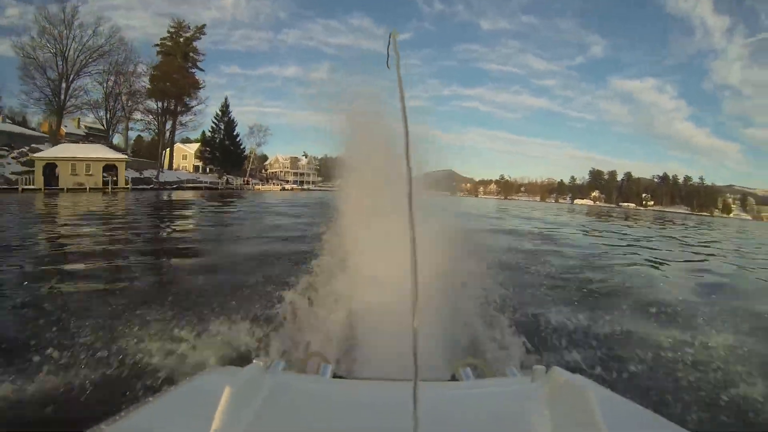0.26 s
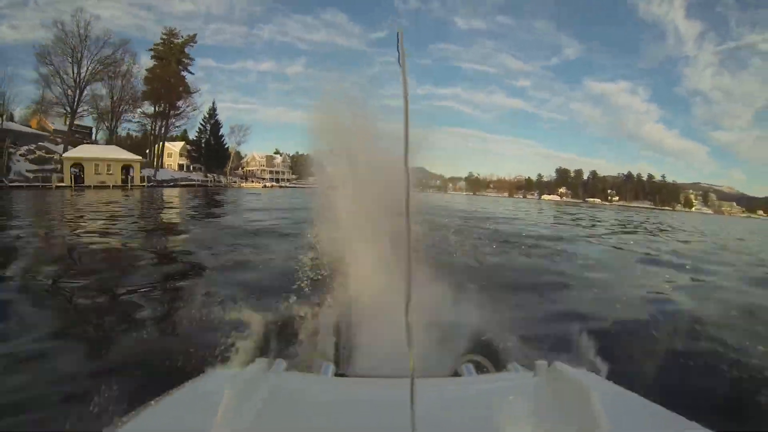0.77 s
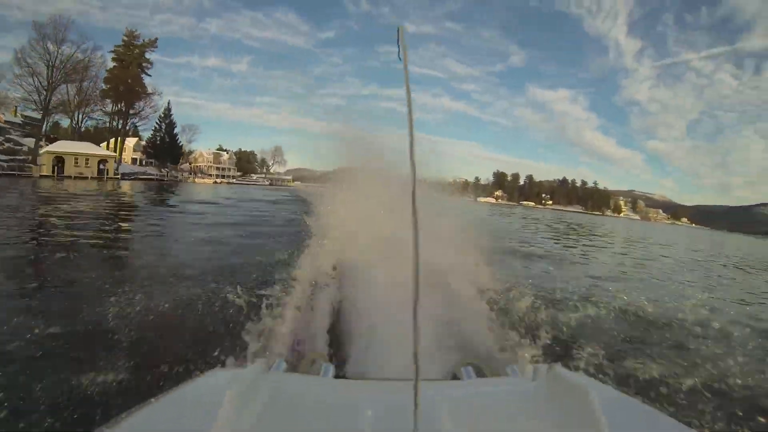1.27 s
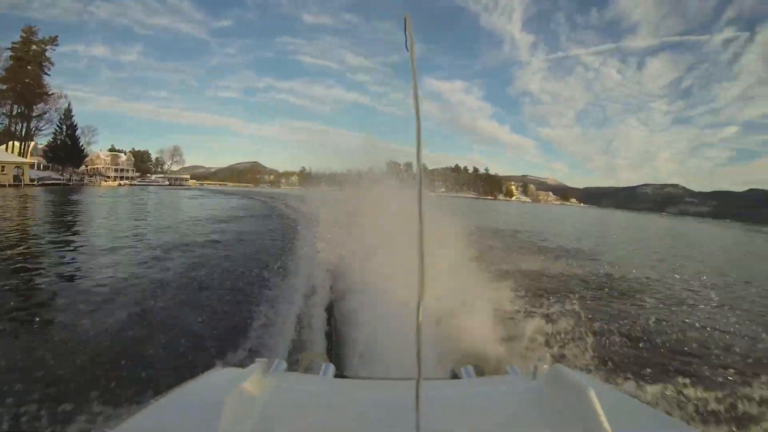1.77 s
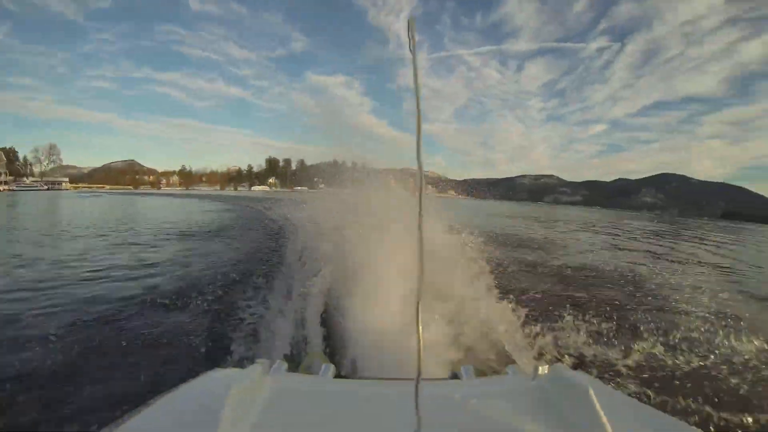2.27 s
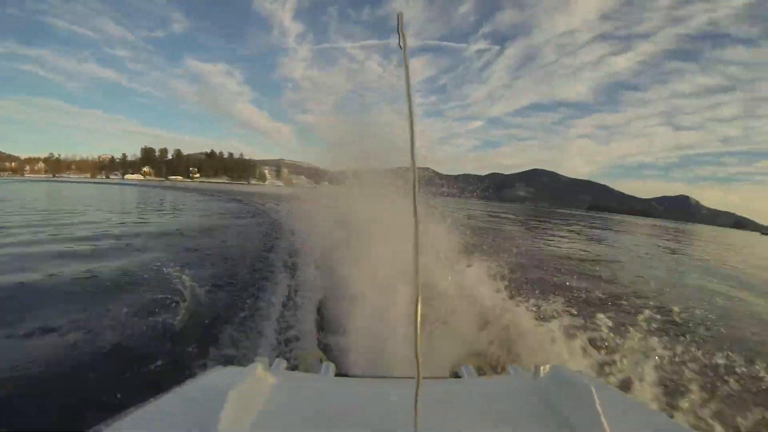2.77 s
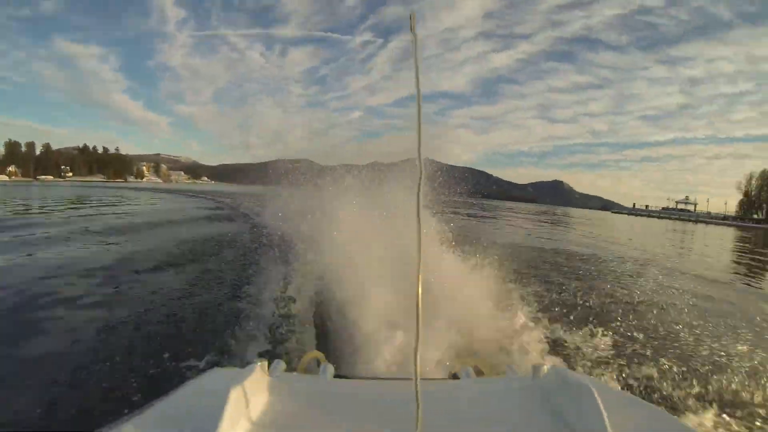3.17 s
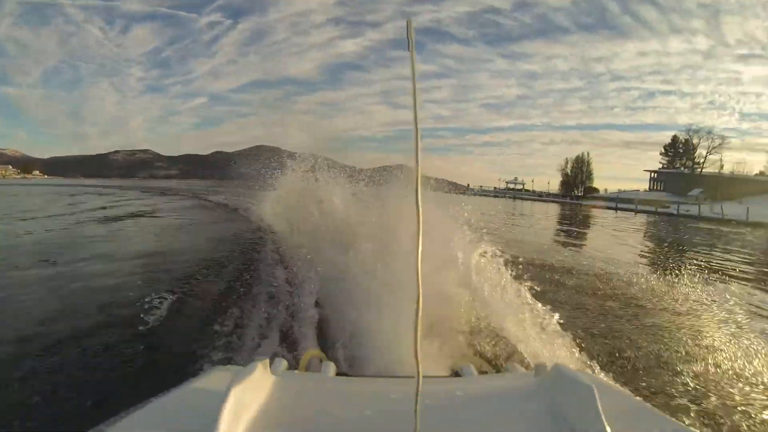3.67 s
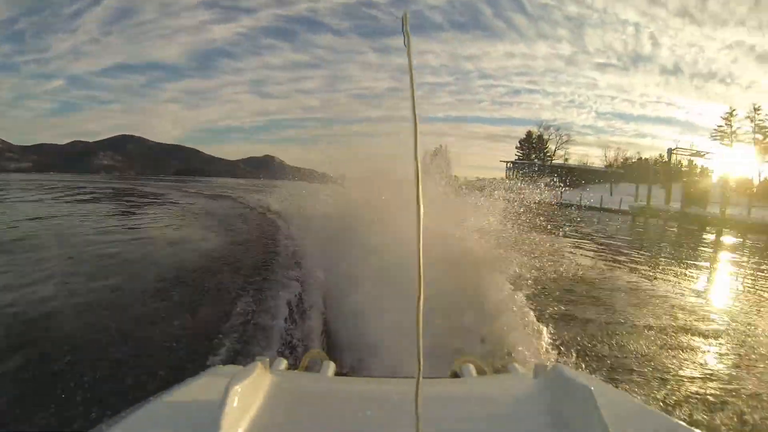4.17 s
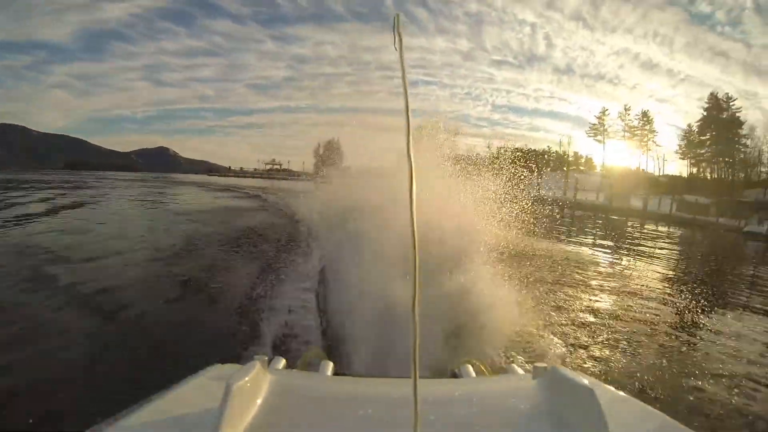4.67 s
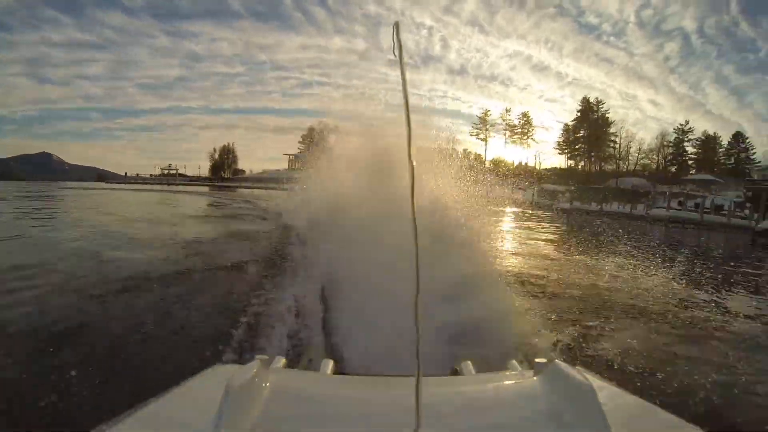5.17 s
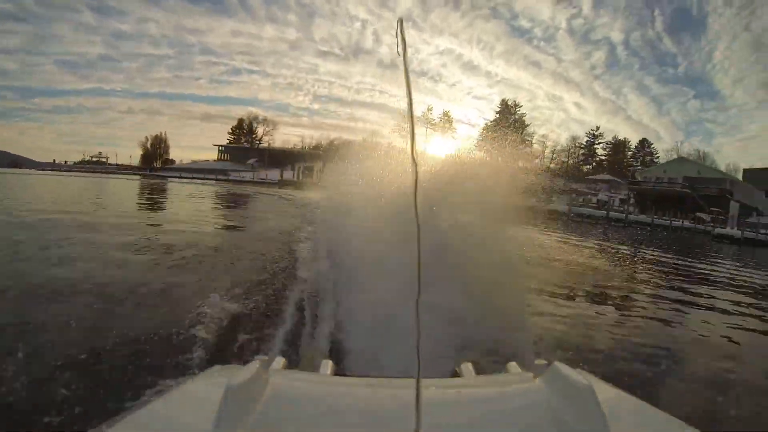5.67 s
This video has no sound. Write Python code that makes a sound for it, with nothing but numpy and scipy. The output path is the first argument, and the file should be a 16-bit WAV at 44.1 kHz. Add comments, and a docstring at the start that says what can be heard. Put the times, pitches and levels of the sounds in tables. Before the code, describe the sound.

A small two-stroke engine buzzes at high revs, driving a model racing boat across a lake, heard from the boat's own deck. The pitch sags through a long turn, then climbs again, and the exhaust blares in short surges. The hull drones, its panels rattle and loose fittings tick, while water slaps underneath and spray hisses faintly.

```python
"""A buzzing, rattling two-stroke drives a model racing boat over a lake, heard from its own deck.
The revs sag in a long turn and climb again; the exhaust blares whenever the propeller bites.
Every firing shakes the hull: it drones at the firing rate, its panels ring, and loose fittings
chatter and tick. Water slaps the hull, spray hisses faintly and the chop thumps below."""
import sys
import numpy as np
from scipy import signal
from scipy.fft import rfft, irfft
from scipy.io import wavfile
from scipy.ndimage import uniform_filter1d

SR = 44100
rng = np.random.default_rng(int(sys.argv[2]) if len(sys.argv) > 2 else 0)


def store_wav(level_fs):
    """Save 16-bit WAV to argv[1]."""
    pcm = np.round(np.clip(np.atleast_2d(level_fs), -1, 1) * 32767)
    wavfile.write(sys.argv[1], SR, pcm.T.astype(np.int16))


N = 261027
TIME = np.arange(N) / SR

# propeller bites: (time [s], length [s], exhaust rise [dB], sag [firings/s], recovery [s])
BITES = [(-0.05, 0.3, 6, 0, .1), (0.242, .215, 9, 0, .1), (.5, 0.076, 6, 0, .1), (0.726, 0.037, 10, 0, .1),
         (1.505, 0.27, 4.5, 0, .1), (2.17, 0.14, 7.5, 5.5, .24), (2.52, .26, 4, 4.5, .26),
         (2.866, 0.055, 7.5, 6, 0.087), (3.02, .065, 4, 2, 0.087), (3.248, 0.14, 6, 1, 0.14),
         (3.68, 0.068, 7, 8, 0.29), (4.281, 0.086, 6, 6.5, .11), (4.604, 0.062, 3.5, 9.5, .1),
         (5.42, .52, 4.5, 0, 0.099)]
# water slapping the hull: (time [s], length [s], jolt [dB], relative splash [dB], relative thud [dB])
SLAPS = [(0.324, 0.031, -0.5, -28.5, -39), (0.378, .015, -4, -27.5, -37), (0.415, 0.028, 0.5, -32, -41),
         (0.492, 0.026, 1.5, -28.5, -36), (0.541, .045, 2, -29.5, -30), (0.64, 0.021, 4.5, -33, -47),
         (0.735, 0.032, 1, -30, -19), (0.823, .02, 1, -34, -42), (0.902, 0.025, 3.5, -30, -41),
         (1.158, 0.05, 0, -34, -50), (1.816, 0.028, 4.5, -45, -50), (2.057, .025, 3.5, -36, -45),
         (2.546, 0.018, 3, -38, -45), (2.811, 0.034, -1, -42, -45), (4.554, 0.017, 1, -38, -50),
         (5.308, 0.03, 3.5, -39, -55)]
# ring of the loose fittings: (frequency [Hz], width [Hz], gain [dB])
FITTING_MODES = [(3244, 260, -1), (3836, 75, 1.5), (4720, 220, -8), (5256, 230, 1), (5780, 420, -8)]
# bright colour of a sharp contact: (frequency [Hz], gain [dB])
CONTACT_COLOUR = [(3000, -2), (4300, -1.5), (6000, 0.5), (6500, -26), (7400, -12.5), (8200, 3.5),
                  (8900, -4.5), (9400, -2.5), (10500, -8.5), (11300, -12), (12000, -8), (12900, -9.5),
                  (13400, -15), (14500, -28)]


def hull_drone(turns, revs, shake_db):
    """The hull hums along with the piston; skipping over the water makes it stutter and fall behind."""
    # fader of the drone: (time [s], relative level [dB])
    drone_fader = [(0, -22.5), (.42, -25), (.64, -16), (.78, -21), (1.25, -11.5), (1.42, -16.5),
                   (1.85, -14.5), (2.1, -16), (2.4, -15), (2.8, -17), (3.3, -15.5), (4.5, -14.8),
                   (4.9, -13.5), (5.92, -14.3)]
    # brief stumbles in the drone: (time [s], length [s], drop [dB])
    stumbles = [(.487, 0.015, 6), (.575, .03, 9), (.77, .07, 3), (.93, 0.028, 8), (2.178, 0.07, 9),
                (2.3, 0.04, 8), (2.375, 0.03, 12), (2.52, 0.048, 8), (2.695, .05, 10), (2.96, 0.033, 11),
                (3.115, .045, 7), (3.415, 0.047, 8), (3.625, .055, 5), (3.755, 0.061, 5), (3.98, .02, 7),
                (4.595, 0.045, 7)]
    fastest_bounce_hz = 214.7
    free_share = np.minimum(follow_shake(shake_db, usual_db=-7, slope=1.4), 1)
    angle = 2 * np.pi * np.cumsum(np.minimum(revs, fastest_bounce_hz)) / SR
    bounce = drift(16.6) * np.sin(angle) + drift(16.6) * np.cos(angle)
    bounce = band(bounce, low_hz=152, high_hz=334)
    sway = evened(blend(np.sin(2 * np.pi * turns), bounce, free_share), size=2000)
    # alternate firings differ more when the hull bounces
    sub_octave = from_db(-26) * free_share * drift(12) * np.sin(np.pi * turns)
    level_db = in_time(drone_fader) - spells(stumbles, edge_s=.016) + 2.65 * free_share * drift(16.6)
    # the hull's lopsided swing adds an octave
    octave = from_db(-34 + 3.8 * drift(8)) * np.sqrt(2) * np.cos(4 * np.pi * turns)
    return from_db(level_db + .34) * (sway + sub_octave + octave)


def exhaust(turns, revs, shake_db, bite_db):
    """Low harmonics blare through the pipe; they flutter when water muffles the outlet."""
    # exhaust harmonics: (multiple of the firing rate, relative level [dB])
    harmonics = [(2, -2.5), (3, -5), (4, -2), (5, -8.5), (6, -2.5), (7, 2.5)]
    # colour of the pipe: (frequency [Hz], gain [dB])
    pipe_colour = [(340, -3.5), (430, -6.5), (490, 4.5), (570, 6.5), (650, -4), (695, 8.5), (790, -14.5),
                   (870, 4.5), (950, 3), (1060, -3), (1200, -1.5), (1400, -10)]
    flutter = np.clip(1 - bite_db / 8, .25, 1)
    blare = 0
    for multiple, db in harmonics:
        wobble = .32 * flutter * drift(12)
        flicker_db = 5.4 * flutter * drift(20)
        offset = (multiple - 2) * rng.random()   # only the octave is phase-aligned with the crank
        phase = 2 * np.pi * (multiple * turns + offset) + wobble
        blare += at_hz(pipe_colour, multiple * revs) * from_db(db + flicker_db) * np.sin(phase)
    return follow_shake(shake_db, usual_db=-30, slope=.88) * from_db(bite_db) * evened(blare)


def engine_speed():
    """Firings per second, one a turn: propeller bites drag the revs down, and they climb back."""
    # engine speed between bites: (time [s], rate [firings/s])
    free_revs = [(0, 242.5), (.22, 242.5), (.27, 236.2), (.46, 235.5), (.52, 244), (.64, 233.6),
                 (.72, 251.5), (.8, 234.8), (.87, 228.5), (.94, 230.5), (1.04, 224.3), (1.18, 222.8),
                 (1.36, 196.5), (1.47, 191.3), (1.59, 192.2), (1.77, 181.8), (2.02, 176), (2.8, 175),
                 (3.0, 172), (3.33, 172.3), (3.45, 179), (4.0, 178.7), (4.42, 187.3), (4.8, 185.8),
                 (4.97, 207), (5.13, 214.8), (5.21, 212), (5.33, 219), (5.46, 220.1), (5.59, 214.3),
                 (5.65, 217.6), (5.92, 220.2)]
    fall_s, lag_s = .11, .015   # the sag is deepest just after the blare begins
    sag = 0
    for start, _, _, depth, recovery_s in BITES:
        age = TIME - start - lag_s
        sag += depth * np.clip(1 + np.minimum(age / fall_s, -age / recovery_s), 0, 1)
    return (in_time(free_revs) - sag) * (1 + .0012 * drift(25))


def panel_rattle(turns, jolt_db, bite_db):
    """Firings knock the deck and hatch in step; loose edges knock back at uneven moments."""
    firing = knocks(turns, lag=0, scatter=.003, spread_db=1.5)
    chatter = knocks(turns, lag=.2926, scatter=.1558, spread_db=4.5)
    chatter -= knocks(turns, lag=.7, scatter=.2077, spread_db=2)
    looseness = .83 + .16 * bite_db - .035 * TIME   # rises at each bite, settles during the run
    deck = deck_ring(firing, chatter, looseness, jolt_db, bite_db)
    return deck + hatch_buzz(firing, chatter, looseness, jolt_db)


def deck_ring(firing, chatter, looseness, jolt_db, bite_db):
    """The knocked deck panels ring in the midrange, louder on jolts and bites."""
    # deck panel modes: (frequency [Hz], width [Hz], gain [dB])
    modes = [(1327, 144, -6), (1421, 75, 3.5), (1516, 82, -1), (1608, 53, -2), (1760, 81, -7),
             (1926, 41, -5), (2068, 26, -14)]
    # fader of the deck: (time [s], level [dB])
    deck_fader = [(0, -17), (.6, -16), (1.22, -17), (1.34, -29.5), (1.55, -22.5), (1.9, -20.5), (2.05, -18),
                  (2.9, -16.5), (3.5, -20), (4.35, -18), (4.47, -24.5), (4.68, -18.5), (4.83, -20),
                  (4.9, -27), (5.15, -21.5), (5.26, -26), (5.35, -19), (5.92, -21)]
    # the flexing hull drives each mode more or less hard from moment to moment
    in_step = sum((-1) ** k * from_db(3.63 * drift(27)) * resonate(firing, [mode])
                  for k, mode in enumerate(modes))
    # chatter builds up mostly in the lower, freely swinging modes
    rattling = resonate(chatter, modes[:4]) + from_db(-3.5) * resonate(chatter, modes[4:])
    in_step, rattling = (band(x, low_hz=1040, high_hz=2254) for x in (in_step, rattling))
    level_db = in_time(deck_fader) + .5 * jolt_db + .15 * bite_db + drift(19)
    return from_db(level_db) * blend(in_step, rattling, looseness)


def hatch_buzz(firing, chatter, looseness, jolt_db):
    """The same knocks set the hatch buzzing, pitched above the deck."""
    # hatch modes: (frequency [Hz], width [Hz], gain [dB])
    modes = [(2440, 83, -5.5), (2598, 36, -1.5), (2683, 108, -8.5)]
    # fader of the hatch: (time [s], relative level [dB])
    hatch_fader = [(0, -30), (1.2, -31), (1.33, -43), (1.65, -34.5), (1.9, -37.5), (2.7, -32), (2.95, -36),
                   (4.1, -36), (4.47, -29), (4.61, -38.5), (4.7, -29.5), (4.83, -28.5), (4.89, -41),
                   (5.15, -36), (5.92, -30.5)]
    in_step, rattling = (band(resonate(x, modes), low_hz=2010, high_hz=3040) for x in (firing, chatter))
    level_db = in_time(hatch_fader) + .68 * jolt_db + 1
    return from_db(level_db) * blend(in_step, rattling, 1.02 * looseness)


def fittings(turns, revs, shake_db):
    """Hard parts touch once a turn, in fits: a sharp tick, then a ring as they fall back."""
    fits = from_db(1.7 * np.minimum(drift(38), 1))
    ticks = scuffed(knocks(turns, lag=.084, scatter=.023, spread_db=4.5) * fits, decay_s=.0027)
    rebounds = knocks(turns, lag=.25, scatter=.035, spread_db=0) * fits
    scuffs = scuffed(rebounds, decay_s=.0028) + 1.7 * rebounds
    labouring = np.clip((205 - revs) / 30, 0, 1)   # low revs set the upper modes sizzling
    sizzle = from_db(-8.5 + 11 * labouring) * resonate(scuffs, FITTING_MODES[3:])
    ring = evened(band(resonate(scuffs, FITTING_MODES[:3]) + sizzle, low_hz=2500, high_hz=6630))
    ring_gain = follow_shake(shake_db, usual_db=-40.5, slope=1.03)
    tick_gain = follow_shake(shake_db, usual_db=-43, slope=1.62) * from_db(-2.2 * (1 - labouring))
    return ring_gain * ring + tick_gain * evened(coloured(ticks, CONTACT_COLOUR))


def hull_jolts():
    """Swings in the shaking, in dB: slaps jolt the hull, lifts calm it, ripples make it waver."""
    # the hull lifts off the water: (time [s], length [s], drop [dB])
    lifts = [(.245, 0.061, 3.5), (.44, 0.038, 4.5), (.59, 0.053, 3), (.675, 0.065, 5.5), (.855, 0.046, 2.5),
             (.935, .21, 3), (1.865, 0.062, 4), (2.12, 0.033, 4), (2.485, 0.023, 2), (2.785, 0.03, 6),
             (2.94, 0.064, 3.5), (3.095, 0.028, 4.5), (3.9, .025, 3), (4.22, 0.025, 4), (4.715, 0.025, 6)]
    return spells(SLAPS, edge_s=.0055) - spells(lifts, edge_s=.0055) + 1.17 * drift(22)


def water_slaps():
    """Water hits the hull with a dull thud and spatters over the deck and fittings."""
    splash_decay_s, thud_decay_s, thud_hz = .0053, .013, 100
    splash, thud = np.zeros((2, N))
    for start, _, _, splash_db, thud_db in SLAPS:
        age = np.maximum(TIME - start, 0)
        splash += from_db(splash_db) * np.exp(-age / splash_decay_s) * (age > 0)
        thud += from_db(thud_db) * np.exp(-age / thud_decay_s) * np.sin(2 * np.pi * thud_hz * age)
    spatter = rng.standard_normal(N) * from_db(3 * drift(500))
    bright = from_db(-6) * coloured(spatter, CONTACT_COLOUR)
    ring = from_db(-10) * rms_one(resonate(spatter, FITTING_MODES))
    return splash * (bright + ring) + from_db(-3) * thud


def spray(shake_db):
    """A grainy hiss of drops that grows as the hull shakes harder."""
    # colour of the spray: (frequency [Hz], gain [dB])
    spray_colour = [(100, -1), (270, -6), (390, -4.5), (550, 3), (780, -1), (890, 4.5), (945, 6.5),
                    (1010, 6), (1700, -3.5), (2150, -3), (3500, -6.5), (4300, -18.5), (5800, -20),
                    (6700, -27.5), (14000, -48)]
    drops = rng.standard_normal(N) * from_db(2.8 * drift(150))
    return follow_shake(shake_db, usual_db=-32, slope=.97) * coloured(drops, spray_colour)


def chop():
    """Rough water thumps below; the hull rumbles through waves and heaves after each slap."""
    # deep colour of the thumping: (frequency [Hz], gain [dB])
    thump_colour = [(10, 4.5), (20, 5), (30, -2), (48, -11), (70, -13.5), (95, -12), (130, -15),
                    (300, -47.5), (900, -69.5)]
    # roughness of the water: (time [s], relative level [dB])
    chop_fader = [(0, -31.5), (1.0, -34.5), (1.4, -40), (1.7, -33), (2.7, -34), (3.5, -43), (4.7, -39),
                  (5.1, -47), (5.92, -44)]
    # the hull ploughs into a wave: (time [s], length [s], rise [dB])
    waves = [(.51, 0.079, 11), (.865, 0.11, 9), (4.69, .06, 7)]
    heave_decay_s = .024
    heave = sum(from_db(thud_db + 4.5) * np.exp(-np.abs(TIME - start) / heave_decay_s) * (TIME > start)
                for start, *_, thud_db in SLAPS)
    swell = from_db(in_time(chop_fader) + spells(waves, edge_s=.03) + 2.2 * drift(11) + 2.6)
    return (swell + heave) * evened(coloured(rng.standard_normal(N), thump_colour), size=6000)


def knocks(turns, lag, scatter, spread_db):
    """One click a turn, late by lag and scattered (both in turns); an end stop limits the hardest."""
    timing, force = rng.standard_normal((1400, 2)).T
    at = np.interp(np.arange(len(timing)) + lag + scatter * timing, turns, np.arange(N))
    size = from_db(spread_db * np.minimum(force, 1)) * (at > 0) * (at < N - 2)
    whole, part = at.astype(int), at % 1   # each click is shared between two samples
    clicks = np.bincount(whole, size * (1 - part), N + 1) + np.bincount(whole + 1, size * part, N + 1)
    return clicks[:N]


def scuffed(clicks, decay_s):
    """Each contact grinds on for an instant as a dying burst of noise."""
    envelope = signal.lfilter([1], [1, -np.exp(-1 / (decay_s * SR))], clicks + 1e-18)
    return envelope * rng.standard_normal(N)


def follow_shake(shake_db, usual_db, slope):
    """Gain of a part: usual_db at the hull's usual vibration, plus slope dB per dB of extra shake."""
    return from_db(usual_db + slope * shake_db)


def spells(rows, edge_s):
    """Sum of events that rise, hold and fall, in dB."""
    return sum(db * np.clip(np.minimum(TIME - start, start + length - TIME) / edge_s + .5, 0, 1)
               for start, length, db, *_ in rows)


def from_db(db):
    """Decibels to gain."""
    return 10 ** (np.asarray(db) / 20)


def rms_one(x):
    """Scale to rms 1."""
    return x / np.sqrt(np.mean(x ** 2) + 1e-20)


def in_time(rows):
    """A control curve at every sample."""
    return np.interp(TIME, *np.transpose(rows))


def at_hz(colour, hz):
    """Gain of a colour curve at the given frequencies."""
    knots, db = np.transpose(colour)
    return from_db(np.interp(np.log(hz + 1e-3), np.log(knots), db))


def evened(x, size=2600):
    """Leveller: hold the rms over size samples at 1 and keep the fast detail."""
    return x / np.sqrt(uniform_filter1d(uniform_filter1d(x ** 2, size), size) + 1e-14)


def drift(rate_hz):
    """Smooth random modulation at rms 1, rolling off above rate_hz."""
    hz = np.arange(N // 2 + 1) * SR / N
    return rms_one(irfft(rfft(rng.standard_normal(N)) / (1 + (hz / rate_hz) ** 2), N))


def coloured(x, colour, size=8192):
    """Minimum-phase equaliser with the given colour; the result has rms 1."""
    hz = np.arange(size + 1) * SR / (2 * size)
    cepstrum = irfft(np.log(at_hz(colour, hz)))
    response = irfft(np.exp(rfft(2 * cepstrum[:size], 2 * size)))[:size]
    return rms_one(signal.fftconvolve(x, response)[:N])


def resonate(x, modes):
    """Parallel resonances with alternating signs."""
    out = 0
    for k, (hz, width, db) in enumerate(modes):
        radius = np.exp(-np.pi * width / SR)
        poles = [1, -2 * radius * np.cos(2 * np.pi * hz / SR), radius ** 2]
        ring = signal.lfilter([1, 0, -1], poles, x + 1e-18) * (1 - radius ** 2) / 2
        out += (-1) ** k * from_db(db) * ring
    return out


def band(x, low_hz, high_hz):
    """Steep band-pass: a gentle one applied twice."""
    gentle = signal.butter(2, [low_hz, high_hz], "band", fs=SR, output="sos")
    return signal.sosfilt(gentle, signal.sosfilt(gentle, x))


def blend(steady, loose, share):
    """Crossfade from steady to loose at constant power."""
    share = np.clip(share, 0, 1)
    return evened(np.sqrt(1 - share ** 2) * evened(steady) + share * evened(loose))


def scene():
    """The crank drives drone, exhaust and rattles; bites and jolts change how hard the boat shakes."""
    # how hard the engine shakes the hull: (time [s], level [dB])
    vibration = [(0, -34.5), (.5, -35.5), (1.24, -37), (1.35, -45.5), (1.55, -40.5), (1.91, -38.5),
                 (2.0, -36), (3.36, -36.5), (3.46, -38), (3.74, -36.5), (3.96, -38.5), (4.83, -38),
                 (4.88, -44.5), (5.22, -43.5), (5.4, -40.3), (5.6, -43), (5.92, -41.5)]
    usual_vibration_db = -38
    revs = engine_speed()
    turns = np.cumsum(revs) / SR
    bite_db = spells(BITES, edge_s=.02)
    jolt_db = hull_jolts()
    steady_db = in_time(vibration) - usual_vibration_db
    shake_db = steady_db + .26 * bite_db
    engine = hull_drone(turns, revs, steady_db) + exhaust(turns, revs, steady_db + .6 * jolt_db, bite_db)
    rattle = panel_rattle(turns, jolt_db, bite_db) + fittings(turns, revs, shake_db + jolt_db)
    water = spray(shake_db + .52 * jolt_db) + chop() + water_slaps()
    return (engine + rattle + water)[None]


def record(dry):
    """Soft-clip the highest peaks, fade the ends and cut the top."""
    ceiling, fade_s, cutoff_hz = .9, .003, 14400
    rounded = dry / (1 + (dry / ceiling) ** 8) ** (1 / 8)
    fade = np.minimum(np.minimum(TIME, TIME[::-1]) / fade_s, 1)
    low_pass = signal.ellip(10, .2, 90, cutoff_hz, fs=SR, output="sos")
    return signal.sosfilt(low_pass, rounded * fade)


dry = scene()
out = record(dry)
store_wav(out)
```